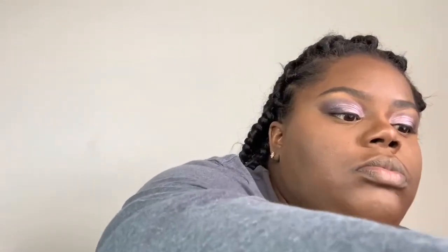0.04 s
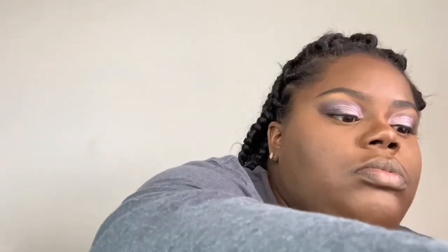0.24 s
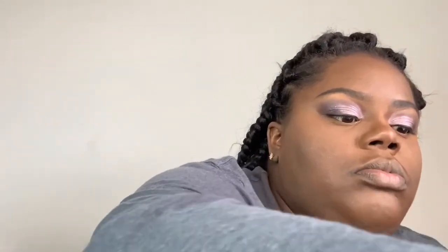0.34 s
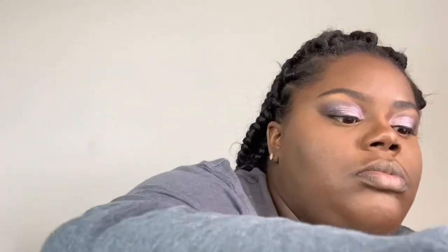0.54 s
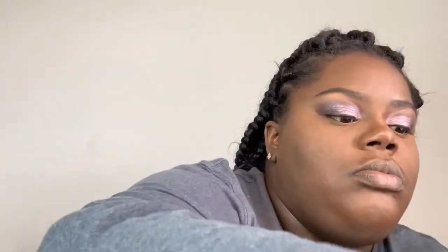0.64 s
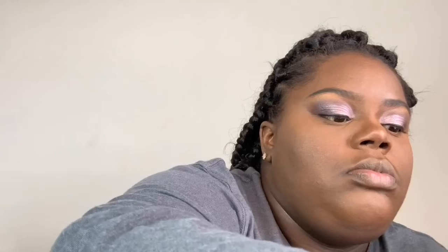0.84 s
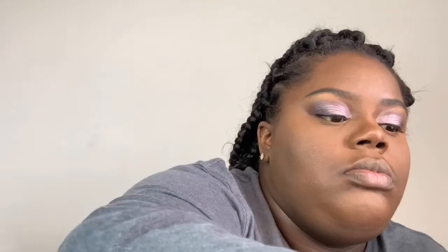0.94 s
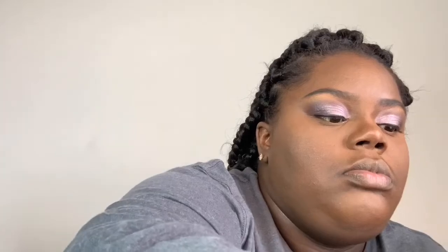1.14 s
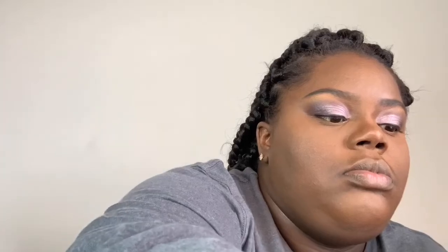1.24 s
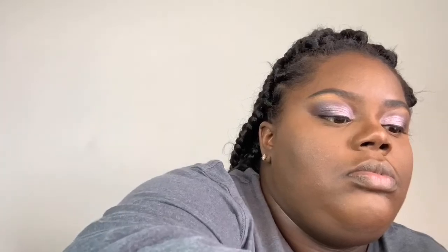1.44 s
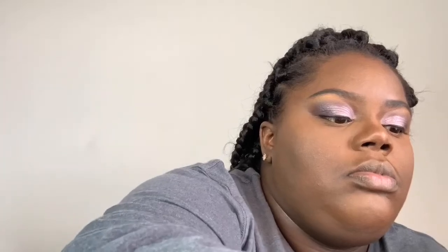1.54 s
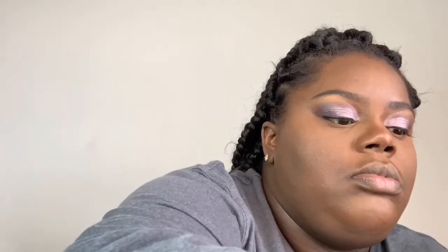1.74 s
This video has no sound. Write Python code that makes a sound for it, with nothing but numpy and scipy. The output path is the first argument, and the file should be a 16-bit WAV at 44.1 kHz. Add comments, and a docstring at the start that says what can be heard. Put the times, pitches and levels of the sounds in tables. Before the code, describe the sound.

Close up in a small room, a low movement rumble and scrape lead to a hard, ringing clatter on a tabletop, followed by irregular clicks of plastic caps, soft bumps and short slides.

```python
"""A low rumble of movement opens over quiet room air, then a scrape and a heavy item clattering down.
Small make-up items are rummaged through on a table in a small room, close to the microphone.
The heavy item sets the table ringing; then things bump the tabletop and hollow cases knock, while
hard plastic caps click and slide over each other. Blows are decaying modes, soft swings and
bursts of coloured noise; scrapes, rumble and air are shaped noise."""
import sys
import numpy as np
from scipy import signal
from scipy.fft import rfft, irfft, next_fast_len
from scipy.io import wavfile
from scipy.ndimage import uniform_filter1d

SR = 44100
rng = np.random.default_rng(int(sys.argv[2]) if len(sys.argv) > 2 else 0)


def generate_wav(sig):
    """Save sig (samples, or channels by samples) to the path in sys.argv[1] as 16-bit PCM at SR."""
    pcm = np.round(np.clip(np.atleast_2d(sig).T, -1, 1) * 32767).astype(np.int16)
    wavfile.write(sys.argv[1], SR, pcm)


N = 79380
HIT = np.arange(SR // 3) / SR  # time axis of one hit, in seconds

# How a plastic cap rings. Each row: multiple of its pitch, level in dB, t60 in seconds.
CAP_MODES = [(.86, -10, 0.005), (1, -5, 0.01), (1.13, -8, 0.0078), (1.55, -14.5, 0.0036)]
# Noise colour of a hollow clack, also the grit in a bump. Each row: frequency in Hz, relative dB per Hz.
CLACK_COLOUR = [(100, -49), (400, 4), (1100, 4.5), (1600, -2.5), (2500, -15), (4400, -22.5), (5500, -28),
                (16000, -59.5)]

CAP_ATTACK_S = 0.0004
BODY_TUNING = 0.97  # pitch factor on the modes of the table and the hollow containers


def amp(db):
    """Decibels to gain."""
    return 10 ** (np.asarray(db) / 20)


def unit(x):
    """Scale to rms 1."""
    return x / np.sqrt(np.mean(x ** 2) + 1e-20)


def along(points, hz):
    """Read (Hz, value) points on a log frequency axis."""
    f, v = np.transpose(points)
    return np.interp(np.log(hz + 1), np.log(f + 1), v)


def fade(t, t60):
    """Exponential decay that loses 60 dB in t60 seconds."""
    return np.exp(-np.log(1000) * t / t60)


def onset(t, rise_s):
    """A smooth, very fast rise from silence to full level."""
    return 1 - np.exp(-(t / rise_s) ** 2)


def padded(x):
    """A short sound followed by silence, as long as one hit."""
    return np.pad(x, (0, len(HIT) - len(x)))


def add(track, s, sound):
    """Mix a sound in at time s."""
    part = track[max(round(s * SR), 0):][:len(sound)]
    part += sound[:len(part)]


def filtered(x, response):
    """Filter x by a response given as a function of frequency."""
    m = next_fast_len(len(x) + 1024)
    spectrum = rfft(x, m) * response(np.fft.rfftfreq(m, 1 / SR))
    return irfft(spectrum, m)[:len(x)]


def noise(spectrum, size):
    """Coloured noise of rms 1."""
    white = rng.standard_normal(size)
    return unit(filtered(white, lambda hz: amp(along(spectrum, hz))))


def grain(size, depth_db):
    """The uneven grip of rubbing surfaces: a slow random gain, rms 1."""
    wander = unit(uniform_filter1d(rng.standard_normal(size), size=90))
    return unit(amp(depth_db * wander))


def burst(spectrum, t60, size=1400):
    """A contact's noise: a very fast rise, then it dies quickly."""
    t = HIT[:size]
    envelope = fade(t, t60) * onset(t, rise_s=0.00032)
    envelope_rms = np.sqrt(np.mean(envelope ** 2))
    return padded(unit(noise(spectrum, size) * envelope) * envelope_rms)


def ring(modes, pitch, attack_s, scatter_db, detune):
    """Decaying, slightly unsteady modes, weighted and tuned a little differently at every blow."""
    waver_rad = 0.5  # spread of the phase drift
    chance = rng.standard_normal((len(modes), 2))
    drifts = rng.standard_normal((len(modes), 40))
    out = np.zeros(len(HIT))
    for k, ((hz, db, t60), (a, b), drift) in enumerate(zip(modes, chance, drifts)):
        t = HIT[:int(t60 * SR)]
        waver = waver_rad * np.interp(t, np.linspace(0, HIT[-1], len(drift)), drift)
        mode_hz = hz * pitch * (1 + detune * b)
        level = (-1) ** k * amp(db + scatter_db * a)  # neighbours start in opposite phase
        out[:len(t)] += level * fade(t, t60) * np.sin(2 * np.pi * mode_hz * t + waver)
    return out * onset(HIT, attack_s)


def bump(hz, cycles, size=3000):
    """A soft blow: a few gritty swings that swell for the given cycles and die."""
    swings = HIT[:size] * hz
    swell = swings / cycles * np.exp(1 - swings / cycles)
    tone = np.sin(2 * np.pi * swings)
    return padded(swell * (tone + 0.16 * noise(CLACK_COLOUR, size)))


def movement():
    """The reaching arm makes a low rumble and shuffles things about: two noises with moving levels."""
    # Each row: time in seconds, rumble level in dB, shuffling level in dB.
    arm_path = [(0, -49.5, -68.5), (.18, -70, -82), (0.271, -36, -36.5), (.45, -53.5, -58),
                (.70, -50.5, -60.5), (.79, -44, -49.5), (.88, -50, -45), (.98, -35, -44.5),
                (1.109, -48.5, -63.5), (1.199, -42, -53), (1.31, -46.5, -48), (1.37, -41, -44.5),
                (1.49, -44.5, -48.5), (1.62, -47.5, -52), (1.8, -49.5, -53)]
    # Each row of both colours: frequency in Hz, relative dB per Hz.
    rumble_colour = [(15, -23), (35, -9.5), (60, 2), (90, 2.5), (140, -2), (200, -6), (400, -33),
                     (1500, -78), (4000, -130)]
    shuffle_colour = [(30, -22), (200, -2.5), (450, 2), (800, -13.5), (1600, -15), (3000, -20), (5000, -26),
                      (7000, -35.5), (16000, -42)]
    s, *levels = np.transpose(arm_path)
    rumble_gain, shuffle_gain = [amp(np.interp(np.arange(N) / SR, s, db)) for db in levels]
    rumble = rumble_gain * noise(rumble_colour, N)
    shuffle = shuffle_gain * noise(shuffle_colour, N) * grain(N, depth_db=1.5)
    return rumble + shuffle


def room_air():
    """The quiet background: steady coloured noise."""
    # Each row: frequency in Hz, relative dB per Hz.
    air_colour = [(20, -7.5), (60, -3), (100, -7), (143, 7), (190, -11.5), (450, -15), (700, -24),
                  (1200, -27), (2500, -50.5), (6000, -51.5), (16000, -42)]
    return amp(-52.5) * noise(air_colour, N)


def slides():
    """Short scrapes that swell and stop: a grainy hiss and tiny slips that ring the plastic."""
    # Each row: start in seconds, length in seconds, level in dB.
    scrapes = [(0.181, 0.092, -49.5), (.548, 0.061, -56.5), (0.655, 0.039, -54), (0.762, 0.028, -62),
               (0.813, 0.12, -57.5), (0.919, 0.046, -44.5), (0.963, 0.033, -62), (1.131, 0.065, -50),
               (1.151, 0.027, -47.5), (1.187, 0.12, -56.5), (1.323, 0.08, -59), (1.438, 0.055, -55),
               (1.529, 0.12, -57), (1.674, 0.053, -57)]
    # Hiss of the rubbing. Each row: frequency in Hz, relative dB per Hz.
    hiss_colour = [(200, 10), (1500, -11), (2800, -6.5), (4000, -6.5), (5500, -13), (8000, -11.5),
                   (9500, -17.5), (11500, -8.5), (15500, -15)]
    slips_per_s, slip_hz, slip_db, slip_spread_db = 530, 2800, -7, 1
    size = len(HIT)
    out = np.zeros(N)
    for s, length, db in scrapes:
        n = int(length * SR)
        happens = rng.random(size) < slips_per_s / SR
        slips = happens * amp(slip_spread_db * rng.standard_normal(size))
        plastic = ring(CAP_MODES, slip_hz, CAP_ATTACK_S, scatter_db=7.5, detune=0.024)
        ticks = unit(signal.fftconvolve(slips, plastic)[:size])
        hiss = noise(hiss_colour, size) * grain(size, depth_db=2.5)
        scrape = hiss + amp(slip_db) * ticks
        add(out, s, amp(db) * scrape[:n] * signal.windows.tukey(n, 0.5))
    return out


def heavy_item():
    """The heavy item lands, rocks and rattles: each contact thumps, clacks and rings the table."""
    # Each row: start in seconds, thump level in dB, thump pitch in Hz, table ring in dB, clack in dB.
    landings = [(0.19, -26.5, 203, -35.5, -33), (0.1986, -25, 180.6, -25.5, -28.5),
                (.217, -23.5, 186, -20.5, -11.5), (0.2264, -14, 324, -24.5, -22.5),
                (.294, -21.5, 307, -19.5, -14.5), (0.3026, -32, 426, -23.5, -19),
                (.334, -21.5, 343, -36, -22.5)]
    # The table's modes. Each row: frequency in Hz before BODY_TUNING, level in dB, t60 in seconds.
    board_modes = [(82.3, -20.5, 0.79), (138, -23, 0.098), (186.5, -4, .16), (237, -8, 0.078),
                   (326.6, 3, 0.063), (331.9, 0.5, 0.15), (367, -6.5, 0.11), (514.2, -12, 0.24),
                   (540, -1.5, 0.12), (726, -12, .18), (832, -16, 0.16), (980, -6.5, 0.055),
                   (1040, -10, 0.27), (1102.6, -2.5, 0.12), (1208, -9.5, 0.16), (1487, -8, 0.056)]
    # The item's contact noise. Each row: frequency in Hz, relative dB per Hz.
    clatter_colour = [(50, -34), (130, -16), (350, -2), (800, 6.5), (1100, 4), (1500, -4), (1900, -5.5),
                      (2250, -10), (2700, -13.5), (3500, -15), (4400, -14), (5200, -37.5), (8000, -43),
                      (16000, -43)]
    rattle_db, rattle_t60, clatter_t60 = -14.5, 0.2, 0.029  # decays in seconds
    out = np.zeros(N)
    for s, thump_db, hz, ring_db, clack_db in landings:
        board = ring(board_modes, BODY_TUNING, attack_s=0.00075, scatter_db=1.0, detune=0.0039)
        # loose parts buzz on after each landing
        buzz = burst(clatter_colour, rattle_t60, size=len(HIT)) * grain(len(HIT), depth_db=3.5)
        clack = burst(clatter_colour, clatter_t60) + amp(rattle_db) * buzz
        thump = bump(hz, cycles=0.95)
        add(out, s, amp(thump_db) * thump + amp(ring_db) * board + amp(clack_db) * clack)
    return out


def caps():
    """Small hard parts click: a bright snap, a dry crack and a few milliseconds of ring."""
    # Each row: start in seconds, ring and crack level in dB, pitch in Hz, snap level in dB.
    clicks = [(.1995, -22.5, 2560, -41), (.217, -6.5, 2630, -56), (.294, -18.5, 2630, -30.5),
              (0.5425, -27, 2550, -44), (0.6085, -34.5, 2520, -47.5), (0.663, -40, 2750, -53),
              (0.7592, -36, 2796, -70), (0.782, -31.5, 2530, -44), (0.845, -32, 2350, -41),
              (.8954, -34, 2190, -59), (.9112, -30.5, 3350, -32.5), (.926, -19.5, 2040, -29),
              (0.9352, -21.5, 2180, -53), (0.9754, -28, 2310, -63), (1.007, -57, 2800, -44),
              (1.135, -39, 2750, -43), (1.165, -30.5, 2700, -33), (1.2254, -30.5, 3080, -39),
              (1.252, -29, 2650, -37.5), (1.3194, -29.5, 2690, -45), (1.323, -30.5, 2640, -47),
              (1.351, -29, 1950, -46), (1.369, -47, 2880, -40), (1.412, -41, 2520, -47),
              (1.4504, -30, 2430, -32.5), (1.543, -49, 2600, -44.5), (1.558, -43, 2750, -59)]
    # Each row of both colours: frequency in Hz, relative dB per Hz.
    crack_colour = [(400, -25), (1500, -12), (2200, 2), (2700, 4), (3300, -2.5), (4400, -29), (5300, -31.5),
                    (16000, -52)]
    snap_colour = [(500, -38), (2000, -1), (4000, 8.5), (6000, -2.5), (8000, 1.5), (11000, -1),
                   (15000, 2.5)]
    crack_db, crack_t60, snap_t60 = -11.5, 0.015, 0.008  # crack relative to ring, decays in seconds
    out = np.zeros(N)
    for s, ring_db, hz, snap_db in clicks:
        plastic = ring(CAP_MODES, hz, CAP_ATTACK_S, scatter_db=3.5, detune=0.0056)
        body = plastic + amp(crack_db) * burst(crack_colour, crack_t60)
        add(out, s, amp(ring_db) * body + amp(snap_db) * burst(snap_colour, snap_t60))
    return out


def tabletop_bumps():
    """Lighter things bump the tabletop: dull, soft blows without a table ring."""
    # Each row: start in seconds, level in dB, pitch in Hz.
    bumps = [(0.6, -38, 315), (.759, -37.5, 560), (.783, -36, 470), (.845, -33, 500), (0.8951, -23, 372),
             (0.9385, -21.5, 463), (0.951, -29.5, 222), (0.978, -27.5, 308), (0.992, -34, 364),
             (1.002, -21, 463), (1.013, -51, 413), (1.338, -22, 498), (1.382, -28, 398), (1.414, -30, 394),
             (1.5452, -24, 450), (1.557, -28, 450), (1.594, -33, 382), (1.604, -35.5, 370)]
    out = np.zeros(N)
    for s, db, hz in bumps:
        add(out, s, amp(db) * bump(hz, cycles=0.67))
    return out


def hollow(knocks, modes):
    """A hollow container clacks and its modes ring briefly."""
    out = np.zeros(N)
    for s, ring_db, clack_db in knocks:
        body = ring(modes, BODY_TUNING, attack_s=0.00091, scatter_db=1.2, detune=0.0035)
        clack = burst(CLACK_COLOUR, t60=0.027)
        add(out, s, amp(ring_db) * body + amp(clack_db) * clack)
    return out


def hollow_case():
    """A hollow case is knocked and its shell rings."""
    # Each row: start in seconds, ring level in dB, clack level in dB.
    case_knocks = [(.7822, -43.5, -36.5), (.846, -51, -40), (.8955, -44, -49), (.9272, -23.5, -25.5),
                   (.936, -23.5, -34.5), (.9755, -42, -30), (1.2255, -41, -36.5), (1.336, -38.5, -45),
                   (1.352, -35, -30.5), (1.411, -43.5, -47)]
    # Each row: frequency in Hz before BODY_TUNING, level in dB, t60 in seconds.
    case_modes = [(428, -7, 0.12), (485, -6, 0.056), (618, -3.5, 0.19), (843, -11.5, 0.096),
                  (1057, -7.5, 0.043), (1588, -6, 0.065), (1748, -6.5, 0.031), (2025, -9, 0.038),
                  (2200, -14.5, 0.045), (2170, -18, 0.036)]
    return hollow(case_knocks, case_modes)


def small_jar():
    """A small jar is set down and settles, ringing at each contact."""
    # Each row: start in seconds, ring level in dB, clack level in dB.
    jar_knocks = [(1.451, -32, -49), (1.4615, -43.5, -37), (1.475, -47, -36)]
    # Each row: frequency in Hz before BODY_TUNING, level in dB, t60 in seconds.
    jar_modes = [(514, 1.5, 0.065), (616, -5, 0.11), (930, -4.5, 0.062), (1060, -2.5, 0.043),
                 (1460, -3, 0.05), (1570, 0.5, 0.057), (2286, -15, .06)]
    return hollow(jar_knocks, jar_modes)


def room(x):
    """The direct sound, near walls and a short diffuse tail whose decay depends on frequency."""
    # Each row: frequency in Hz, t60 in seconds.
    tail_decay = [(100, 0.33), (400, 0.32), (1100, 0.39), (2800, 0.46), (7000, 0.23), (16000, 0.3)]
    # Each row: frequency in Hz, tail gain in dB.
    tail_colour = [(60, -4.5), (300, -3), (1100, 0.5), (2800, -6.5), (7000, 2), (16000, -12)]
    # Early echoes. Each row: delay in seconds, level in dB.
    wall_echoes = [(.0042, -27), (.0105, -15.5), (.019, -24)]
    tail_db, build_s = -7.5, 0.0027  # tail level before its colour, build-up time in seconds
    hz, t, bands = signal.stft(rng.standard_normal(len(HIT)), SR, nperseg=256)
    decaying = bands * fade(t, along(tail_decay, hz)[:, None])
    tail = signal.istft(decaying, SR, nperseg=256)[1][:len(HIT)]
    tail = tail * (1 - np.exp(-HIT / build_s))
    tail = tail / np.linalg.norm(tail)
    response = amp(tail_db) * filtered(tail, lambda f: amp(along(tail_colour, f)))
    response[0] += 1  # direct sound
    for s, db in wall_echoes:
        add(response, s, amp([db]))
    return signal.fftconvolve(x, response)[:N]


def scene():
    """Blows and clicks are heard in the room; slides, movement and air are mixed in without it."""
    knocks = room(heavy_item() + tabletop_bumps()) + room(caps())
    knocks = knocks + room(hollow_case()) + room(small_jar())
    return (movement() + room_air() + slides() + knocks)[None]


def record(dry):
    """The microphone has a gentle low cut, two narrow dips in the treble and a band limit."""
    # The dull spots. Each row: centre in Hz, width in Hz of one pass (each dip is applied twice).
    dull_spots = [(9450, 467), (13300, 1340)]
    low_cut_hz, top_hz = 22, 15900

    def microphone(f):
        dips = np.prod([np.abs(f - hz) / np.hypot(f - hz, width) for hz, width in dull_spots], axis=0)
        low_cut = 1j * f / (low_cut_hz + 1j * f)
        return dips ** 2 * low_cut * (f < top_hz)

    return filtered(dry[0], microphone)[None]


dry = scene()
out = record(dry)
generate_wav(out)
```